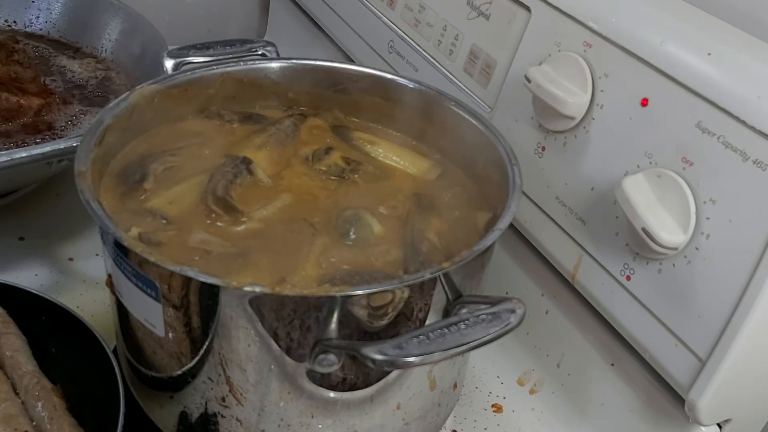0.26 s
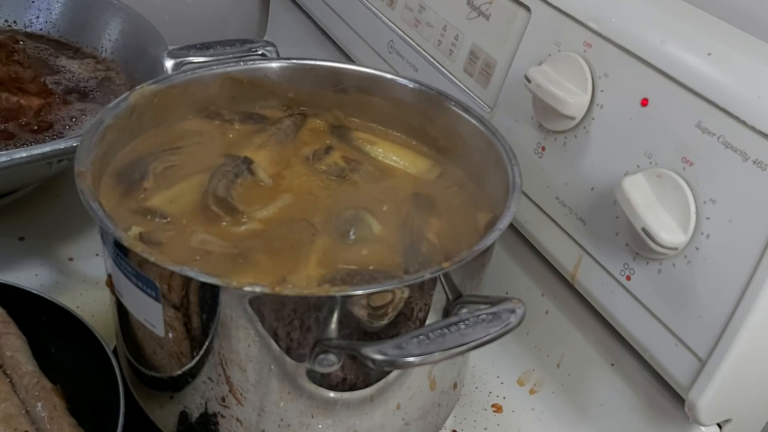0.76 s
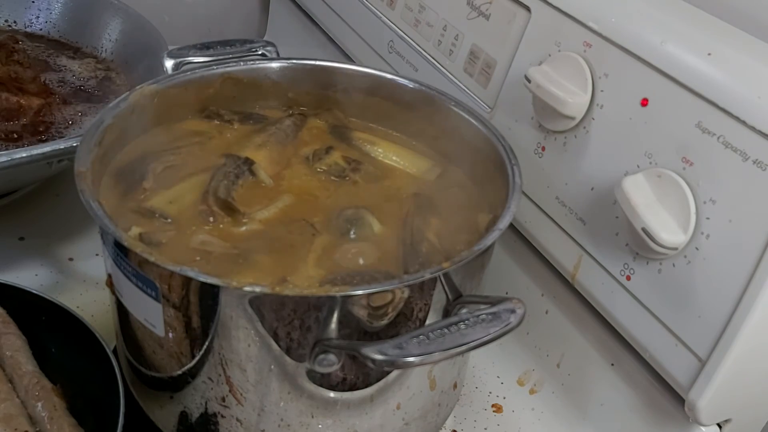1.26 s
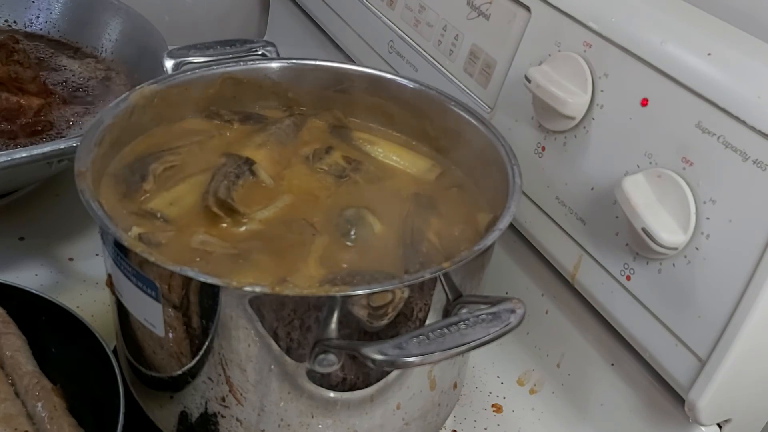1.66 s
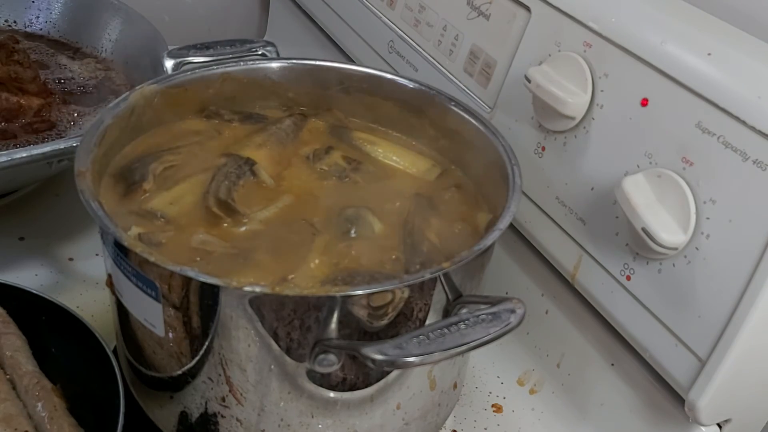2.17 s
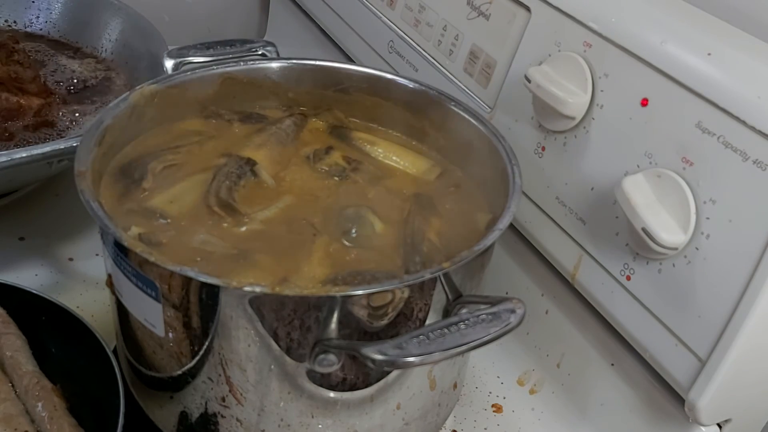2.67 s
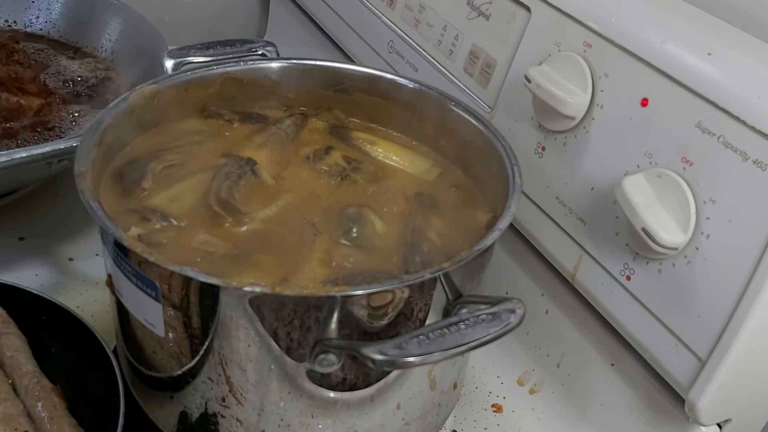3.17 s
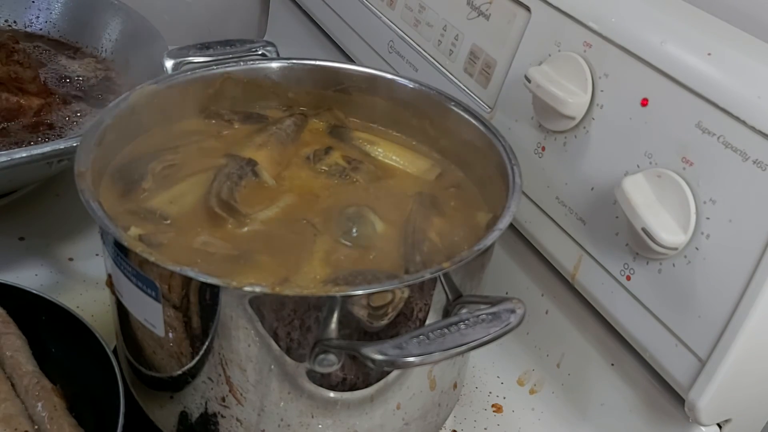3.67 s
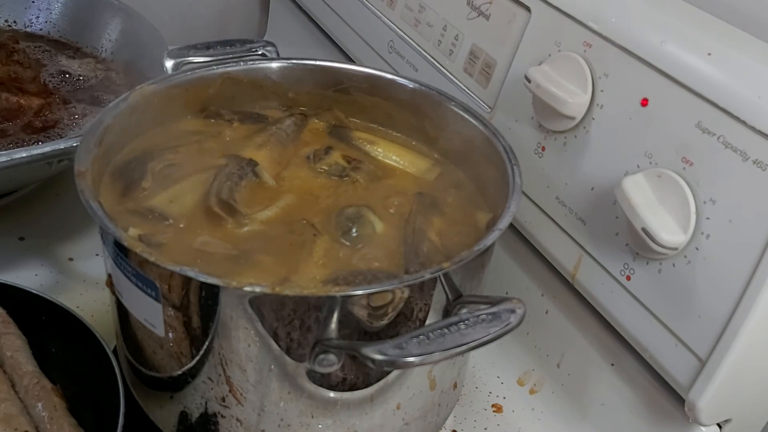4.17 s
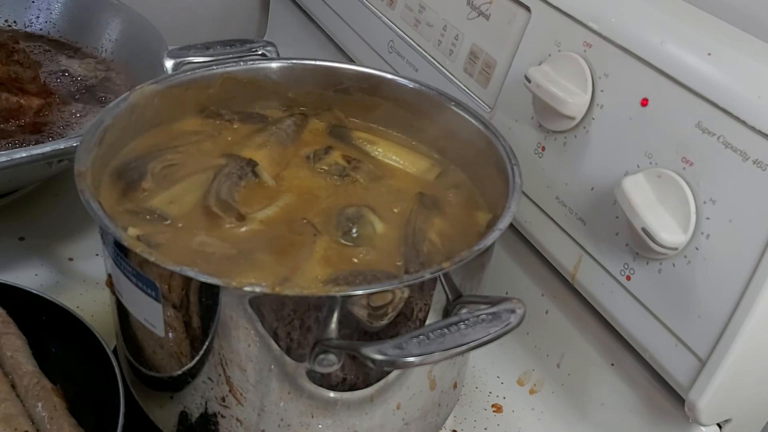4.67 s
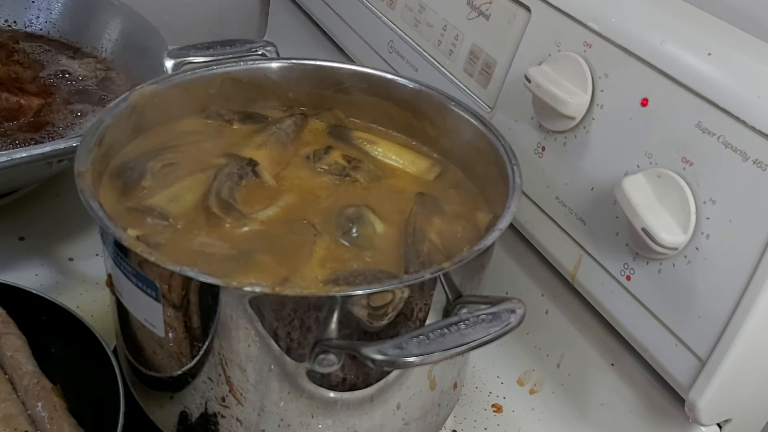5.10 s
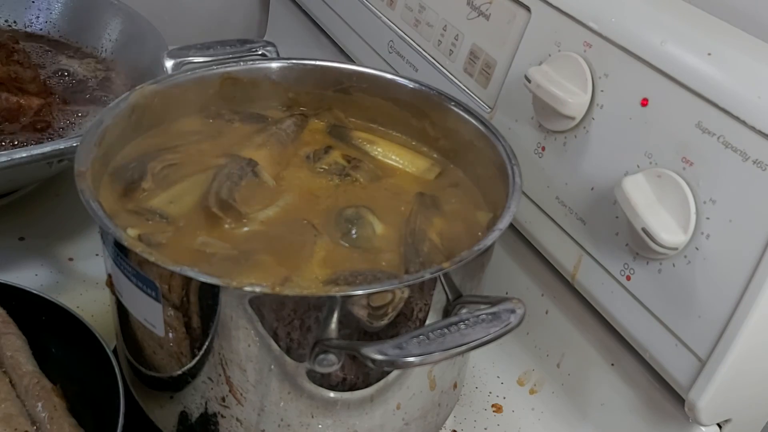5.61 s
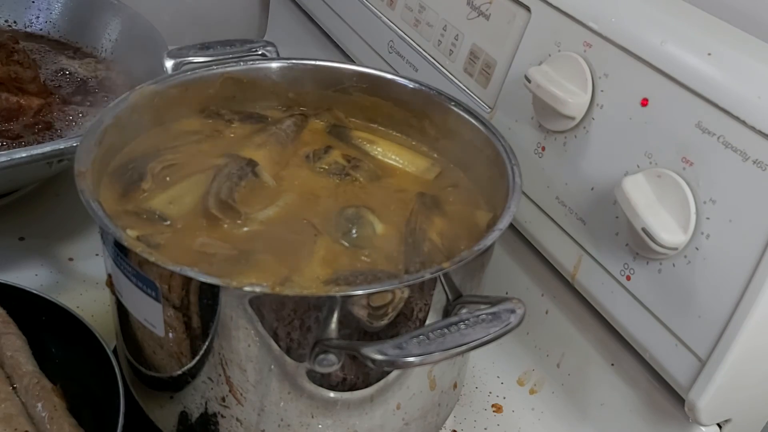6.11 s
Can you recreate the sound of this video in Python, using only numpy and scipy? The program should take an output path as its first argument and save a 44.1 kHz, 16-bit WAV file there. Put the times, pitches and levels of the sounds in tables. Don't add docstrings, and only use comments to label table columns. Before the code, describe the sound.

In a small hard kitchen, an extractor fan hums low and steady with rushing air. Close to the microphone, thick stew pops and patters. A pan beside it sizzles brightly for two seconds, then drops to faint steam and scattered crackles. A soft footstep thuds as it calms. Later a dish thumps the counter, and its metal clangs and clinks briefly before the simmer continues.

```python
import sys
import numpy as np
from scipy import signal
from scipy.fft import rfft, irfft, next_fast_len
from scipy.io import wavfile
from scipy.ndimage import uniform_filter1d

SR = 44100
rng = np.random.default_rng(int(sys.argv[2]) if len(sys.argv) > 2 else 0)


def file_out(sig):
    cols = np.atleast_2d(sig).T
    lim = np.clip(cols, -1, 1)
    pcm = np.round(lim * 32767).astype(np.int16)
    wavfile.write(sys.argv[1], SR, pcm)


def makeup_ratio(level_db):
    decades = np.asarray(level_db, float) / 20
    return 10 ** decades


N = 279934
T = np.arange(N) / SR
SIDES = np.array([[1], [-1]])


def unit(x):
    return x / np.sqrt(np.mean(x ** 2))


def curves(table):
    s, *columns = np.transpose(table)
    return [np.interp(T, s, c) for c in columns]


def on_log_hz(hz, table):
    f, v = np.transpose(table)
    return np.interp(np.log(hz + 1), np.log(f), v)


def walk(rate):
    k = int(SR / rate)
    steps = np.repeat(rng.standard_normal(N // k + 1), k)
    slewed = uniform_filter1d(uniform_filter1d(steps, k), k)
    return 1.3 * slewed[:N]


def coloured(x, gain):
    size = next_fast_len(N)
    hz = np.arange(size // 2 + 1) * SR / size
    return irfft(rfft(x, size) * gain(hz), size)[..., :N]


def band(x, lo_hz, hi_hz):
    edges_hz = [lo_hz, min(hi_hz, .45 * SR)]
    return signal.sosfilt(signal.butter(2, edges_hz, "band", fs=SR, output="sos"), x)


def add(out, s, x, pan_db):
    i = int(s * SR)
    x = x[..., :N - i]
    out[:, i:i + x.shape[-1]] += x * makeup_ratio(SIDES * pan_db / 2)


def kitchen(x):
    t60_s, tail_db = 0.22, -3.5
    t = T[:SR // 2]
    tail = rng.standard_normal((2, len(t))) * makeup_ratio(-60 * t / t60_s) * np.minimum(t / 0.00096, 1)
    tail = signal.lfilter([1], [1, -.45], tail)
    tail = makeup_ratio(tail_db) * tail / np.sqrt(np.sum(tail ** 2, axis=1, keepdims=True))
    return x + signal.fftconvolve(x, tail, axes=1)[:, :N]


# (f/Hz, level/dB per Hz)
AIR = [(25, -21), (33, -11), (43, -5), (70, -6.5), (150, -6.5), (200, -1.5), (295, -7.5), (480, -4),
       (800, -1.5), (1150, -11.5), (1500, -10), (2600, -14), (5500, -25.5), (9000, -32)]
# (f/Hz, width/Hz, level/dB)
DUCT = [(87, 11, 2), (110, 26, 0.5), (212, 42.4, 5.5), (331, 5.9, -17), (359.3, 27, 10.5), (388.3, 67, 6.5),
        (731, 4.5, 7), (156, 10, -8.5), (827, 32, -1.5)]
# (f/Hz, coherence)
LIKENESS = [(60, 0.54), (130, 0.73), (290, 0.93), (640, 0.26), (1410, 0.0063), (3100, 0.00048),
            (6820, 0.01), (15000, -0.0)]
# (f/Hz, left minus right/dB)
LEAN = [(60, -3), (200, 2), (370, -7), (700, -2.5), (2000, -3), (12000, 2)]


def air():
    def gain(hz):
        humps = sum(makeup_ratio(2 * db) / (1 + (2 * (hz - f) / w) ** 2) ** 2 for f, w, db in DUCT)
        return np.sqrt(makeup_ratio(2 * on_log_hz(hz, AIR)) + humps)

    def like(hz):
        return np.sqrt(np.clip(on_log_hz(hz, LIKENESS), 0, 1))

    def octave(hz, k):
        return np.clip(1 - np.abs(np.log2(hz / 30 + 1e-9) - k), 0, 1)

    mid, side = rng.standard_normal((2, N))
    mid = coloured(mid, lambda hz: np.sqrt(1 + like(hz)))
    side = coloured(side, lambda hz: np.sqrt(1 - like(hz)))
    both = mid + SIDES * side
    both = [coloured(x, lambda hz: gain(hz) * makeup_ratio(k * on_log_hz(hz, LEAN) / 2)) for x, k in zip(both, (1, -1))]
    rush = 0
    for k in range(10):
        flicker = makeup_ratio(1.16 * walk(1.66) + 1.54 * walk(9))
        rush = rush + flicker * coloured(both, lambda hz: octave(hz, k))
    return unit(rush)


# (f/Hz, level under the hum/dB, left minus right/dB, left leads/rad)
MOTOR = [(58.12, 0, -4.9, .12), (120.35, -12.5, -4, .05)]


def motor():
    out = 0
    for hz, db, pan_db, lead in MOTOR:
        tone = np.sin(2 * np.pi * hz * T + SIDES * lead / 2)
        out = out + np.sqrt(2) * makeup_ratio(db + SIDES * pan_db / 2) * tone
    return out


# (t/s, tone level/dB, octave level/dB)
BLADES = [(0.0, -29, -35.5), (.4, -28.5, -34.5), (1.1, -26, -33.5), (1.4, -29.5, -33), (1.8, -24.5, -36.5),
          (2.1, -28, -34.5), (2.65, -30.5, -33.5), (3.4, -28, -31.5), (4.0, -29.5, -32), (4.3, -27, -31),
          (4.9, -29.5, -33), (5.5, -28, -37), (5.75, -30, -36), (6.35, -29.5, -31.5)]


def blades():
    blade_hz, drift_hz = 219.4, .3
    tone_db, octave_db = curves(BLADES)
    turn = 2 * np.pi * np.cumsum(blade_hz + drift_hz * walk(1.974)) / SR
    tone = makeup_ratio(tone_db + 1.0 + 0.86 * walk(14) - 1.75 * SIDES) * np.sin(turn)
    octave_phase = 2 * turn + 0.96 * walk(8) + 0.053 * SIDES
    octave = makeup_ratio(octave_db - 0.54 + 2.07 * walk(16) - 4.9 * SIDES) * np.sin(octave_phase)
    twelfth_phase = 3 * turn + .9 * walk(8)
    twelfth = makeup_ratio(octave_db - 11.5 + 2.5 * walk(9) - 1.5 * SIDES) * np.sin(twelfth_phase)
    return np.sqrt(2) * (tone + octave + twelfth)


# (t/s, level/dB)
HUM = [(0.0, -25.5), (2.3, -25.5), (3.2, -26.5), (4.5, -26.5), (4.9, -26), (5.25, -27.5), (6.1, -29),
       (6.35, -26.5)]


def fan():
    air_db = -27.5
    hum_db = curves(HUM)[0]
    return makeup_ratio(hum_db) * motor() + makeup_ratio(hum_db - hum_db.mean() + air_db) * air() + blades()


# (t/s, peak level/dB, f/Hz, t60/s)
BUMPS = [
    (1.99, -15, 104, 0.29),
    (2.03, -23, 70.5, .3),
    (2.06, -29, 48, .25),
    (4.58, -16, 89, .2),
    (4.95, -16.5, 95, 0.23),
]


def floorboards():
    out, t = np.zeros((2, N)), T[:SR // 2]
    for s, db, hz, t60 in BUMPS:
        thump = makeup_ratio(db - 60 * t / t60) * np.minimum(t / 0.067, 1) * np.sin(2 * np.pi * hz * t)
        add(out, s, thump, -4.5)
    return out


CALMS_S = 1.96
# (t/s, rise/dB, length/s)
FLARES = [(2.398, 2, 0.11), (3.4, 0.5, 0.39), (3.786, 6.5, .07), (3.89, 6, 0.087), (4.1, 5, 0.12),
          (4.4, 0.5, 0.11), (4.62, 5, 0.055), (4.847, 6, 0.041), (5.14, 2, .1), (5.99, 0.5, 0.081)]


def pan_level():
    lively_db, drop_db, calm_db, settle_s = -35, -2.5, -49, 0.72
    since = np.maximum(T - CALMS_S, 0)
    settled = calm_db + (lively_db + drop_db - calm_db) * np.exp(-since / settle_s)
    flares = sum(db * np.exp(-(2 * (T - s) / length) ** 2) for s, db, length in FLARES)
    return lively_db + np.minimum(since / 0.017, 1) * (settled - lively_db) + flares


# (f/Hz, level/dB per Hz)
FAT = [(1500, -37), (2500, -15), (4260, -7), (5220, -9), (6260, -7.5), (6810, -9.5), (7560, -5.5),
       (11800, -2.5), (13500, -6), (15000, -7), (16500, -28)]
# (f/Hz, level/dB per Hz)
STEAM = [(2500, -6.5), (4000, 1), (6600, -3), (8200, 4), (9700, -0.5), (12000, 1.5), (14500, -4),
         (16500, -11)]


def sizzle():
    pan_db = pan_level()
    lively = np.clip((pan_db + 40) / 5, 0, 1)
    specks = (rng.random(N) < 900 / SR) * makeup_ratio(4.0 * rng.exponential(size=N))
    puffs = signal.lfilter([1], [1, -.93], specks)
    flicker_db = (1.5 - 1.1 * lively) * walk(14)
    hiss = rng.standard_normal((2, N)) * (1 + 0.14 * puffs) * makeup_ratio(flicker_db - 1.65 * SIDES)
    fat = unit(coloured(hiss, lambda hz: makeup_ratio(on_log_hz(hz, FAT))))
    steam = unit(coloured(hiss, lambda hz: makeup_ratio(on_log_hz(hz, STEAM))))
    return makeup_ratio(pan_db + 5.0) * (lively * fat + (1 - lively) * steam)


# (t/s, peak level/dB, brightness/dB)
CRACKLES = [(0.4073, -14, 3), (0.8027, -24, 2), (1.3547, -20, 8), (2.082, -14.5, 0.5), (2.171, -22.5, 6.5),
            (2.4548, -23, 3), (2.7162, -21.5, -1), (2.7651, -23, -1), (2.84, -27, 4), (3.0704, -22, -1),
            (3.256, -21.5, 2), (3.5169, -23, -1), (3.7187, -22, 2), (3.7346, -16.5, 1), (3.8717, -22, 4),
            (3.8873, -16, 5.5), (3.9913, -21, 0), (4.0176, -17, 0), (4.0766, -22, 0), (4.0894, -18, 2.5),
            (4.2393, -31, 4), (4.3335, -20.5, 1), (4.3834, -25, 2), (4.8756, -19.5, 6), (5.65, -32, 3),
            (5.7823, -23.5, 1), (5.851, -26, 3), (5.9474, -22.5, 2), (5.9617, -24, 4), (6.1544, -32, -9)]


def crackles():
    out, t = np.zeros((2, N)), T[:SR // 5]
    faint = []
    for at, size, tilt in rng.random((40, 3)):
        faint.append((CALMS_S + at * (T[-1] - CALMS_S), -38 + 8 * size, 8 * (tilt - .5)))
    envelope = makeup_ratio(-60 * t / .007) + .2 * makeup_ratio(-60 * t / .04)
    for s, db, tilt_db in list(CRACKLES) + faint:
        noise = rng.standard_normal((2, len(t))) * envelope
        low = makeup_ratio(4.5 - tilt_db) * band(noise, 2140, 5300)
        middle = makeup_ratio(5.0) * band(noise, 5730, 8140)
        high = makeup_ratio(3.5 + tilt_db) * band(noise, 9200, 13700)
        add(out, s + .0012, makeup_ratio(db - 2.0) * (low + middle + high), -2.5 + 2.5 * rng.standard_normal())
    return out


def ring(modes):
    t, x = T[:SR // 2], 0
    for hz, db, t60 in modes:
        start, lean = rng.random(), rng.standard_normal()
        skew = rng.random() * min(hz / 3000, .4)
        phase = 2 * np.pi * (hz * t + start + skew * SIDES / 2)
        x = x + makeup_ratio(db + 2.5 * lean * SIDES - 60 * t / t60) * np.sin(phase)
    return x / np.sqrt(sum(makeup_ratio(2 * db) for _, db, _ in modes))


# (f/Hz, level/dB, t60/s)
COUNTER = [(205, -4, .1), (318, 0, .14), (480, -7, .06), (600, -8, .06), (745, -5, .08), (880, -9, .06),
           (1100, -9, .07), (1400, -10, .07)]
# (f/Hz, level/dB, t60/s)
DISH_LOW = [(1025, -6, .15), (1110, -2, .1), (1140, -2, .1), (1228, -7, .1), (1785, -6, .18),
            (1865, -8, .28), (2230, -11, .08), (2815, -12, .2), (3200, -16, .07)]
# (f/Hz, level/dB, t60/s)
DISH_HIGH = [(637, -2, .1), (1236, -9, .07), (1525, -5, .26), (1692, -10, .28), (1835, -4, .28),
             (1868, -5, .24), (1950, 0, .06), (2036, -6, .12), (2270, -15, .09), (2680, -10, .11),
             (2795, -11, .2), (4140, -14, .15)]
# (t/s, thud level/dB, contact noise level/dB)
THUDS = [
    (4.576, -13, -14),
    (4.586, -14.5, -22.5),
    (4.601, -16.5, -17),
    (4.622, -17, -29),
    (5.43, -24.5, -27),
]
# (t/s, base ring level/dB, rim ring level/dB, contact noise level/dB)
STRIKES = [
    (4.8766, -28, -6, -14),
    (4.909, -36, -26, -29),
    (4.9318, -40, -16, -19.5),
    (4.956, -45, -23, -23),
    (4.9867, -22.5, -25, -17),
    (5.05, -48, -38, -23),
    (5.1177, -16, -25, -25.5),
    (5.231, -23, -38, -13),
    (5.264, -27, -22, -12.5),
]


def dish():
    rings, noises, t = np.zeros((2, N)), np.zeros((2, N)), T[:SR // 2]
    hits = []
    for s, db, noise_db in THUDS:
        hits.append((s, makeup_ratio(db + 2.5) * ring(COUNTER), noise_db, -6, 430))
    for s, base_db, rim_db, noise_db in STRIKES:
        metal = makeup_ratio(base_db + 2.0) * ring(DISH_LOW) + makeup_ratio(rim_db) * ring(DISH_HIGH)
        hits.append((s, metal, noise_db, -3, 900))
    for s, modes, scrape_db, tick_db, low_hz in hits:
        noise = rng.standard_normal((2, len(t)))
        add(rings, s, modes * np.minimum(t / 0.002, 1), -3)
        tick = makeup_ratio(tick_db - 60 * t / 0.067) * band(noise, low_hz, 11300)
        scrape = makeup_ratio(-60 * t / 0.17) * band(noise[::-1], low_hz, 2130)
        add(noises, s, makeup_ratio(scrape_db) * (tick + scrape), -3)
    return band(rings, 120, 8100), noises


def grain(hz, cycles, glide):
    turns = T[:SR // 40] * hz
    tone = np.sin(2 * np.pi * turns * (1 + glide * turns / cycles))
    return np.minimum(turns, 1) * np.exp(-turns / cycles) * tone


# (t/s, patter level/dB)
STEW = [(0.0, -34.5), (1.15, -35.5), (1.4, -39), (1.96, -34.5), (2.9, -48), (4.2, -49), (4.8, -47),
        (5.1, -32), (5.7, -56), (6.35, -51)]
# (t/s, peak level/dB, f/Hz)
BUBBLES = [(0.1608, -16, 2470), (0.4085, -23, 3260), (0.6605, -17, 2520), (1.207, -16, 2670),
           (1.3089, -16, 3390), (1.4073, -17, 2170), (1.52, -20, 2530), (1.72, -25, 2400),
           (2.0374, -14.5, 2470), (2.658, -15, 2740), (2.7215, -18, 2760), (2.964, -22, 3430),
           (3.192, -16, 3430), (3.4195, -19, 2250), (3.5089, -21, 3400), (3.7349, -29, 3700),
           (3.956, -19, 2370), (4.0874, -17, 3300), (4.2475, -20, 2470), (4.2775, -17.5, 2220),
           (4.5417, -20, 3560), (4.576, -19, 2060), (5.2295, -11, 2230), (5.266, -11, 2590),
           (5.4031, -19, 3680), (5.656, -20.5, 3530), (5.782, -17, 2350)]


def stew():
    out = np.zeros((2, N))
    for at, pitch, size, side in rng.random((1500, 4)):
        pop = makeup_ratio(-7 * np.log10(size + 0.094)) * grain(1400 * 3.1 ** pitch, 4.3, 0.054)
        add(out, at * T[-1], pop * SIDES ** (side > .5), 16 * (side - .5))
    out = makeup_ratio(curves(STEW)[0] - 7.5) * unit(out)
    for s, db, hz in BUBBLES:
        for k, (late, pitch, side) in enumerate(rng.random((4, 3))):
            pop = grain(hz * (.86 + .28 * pitch), 6, .04)
            after_s = 0.015 * late * (k > 0)
            add(out, s + after_s, makeup_ratio(db - 7 - 2.9 * k) * pop * SIDES ** (side > .5), -3.5)
    return out


def scene():
    background = fan() + floorboards() + sizzle()
    rings, noises = dish()
    return background + rings + kitchen(stew() + crackles() + noises)


def band_limit(x):
    return signal.sosfilt(signal.butter(12, 15750, fs=SR, output="sos"), x)


def record(dry):
    soft = np.tanh(.6 * dry) / .6
    mix = signal.sosfilt(signal.ellip(8, .3, 60, 15900, fs=SR, output="sos"), soft)
    return band_limit(mix)


dry = scene()
out = record(dry)
file_out(out)
```